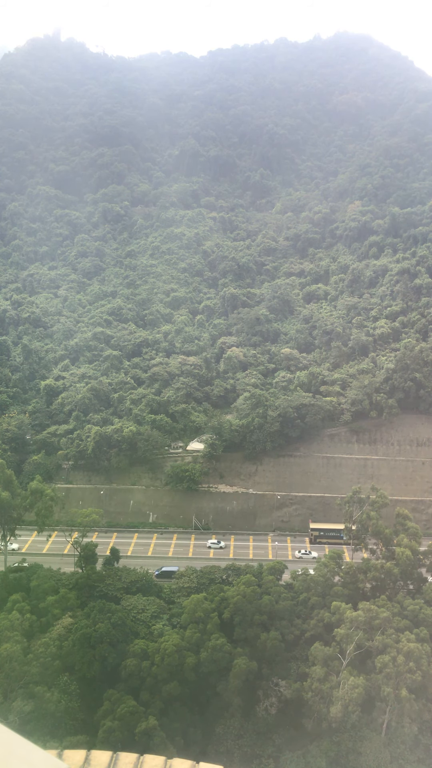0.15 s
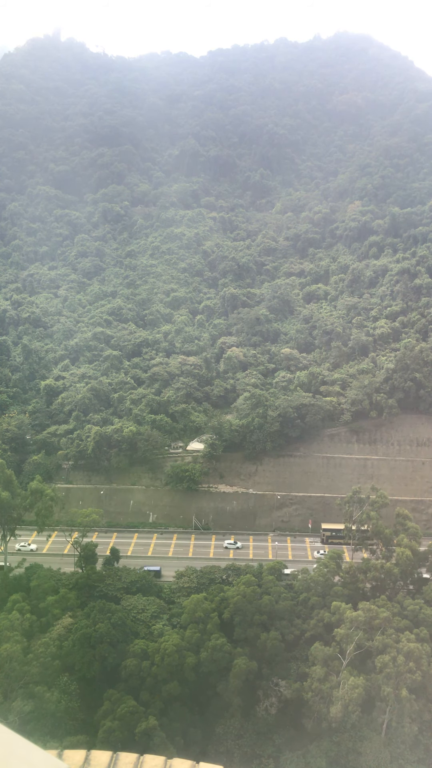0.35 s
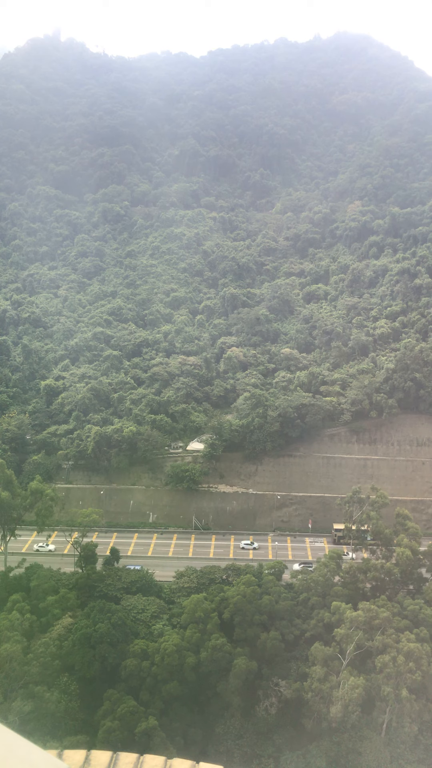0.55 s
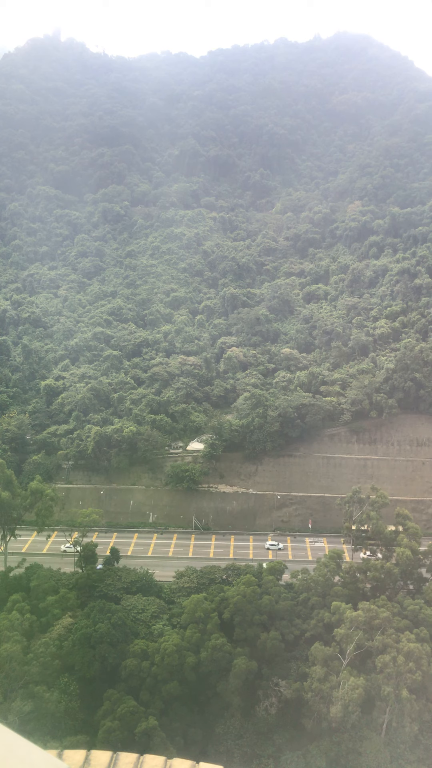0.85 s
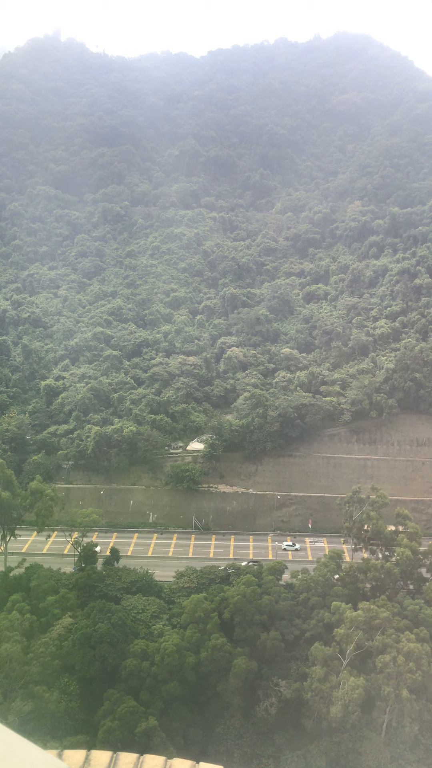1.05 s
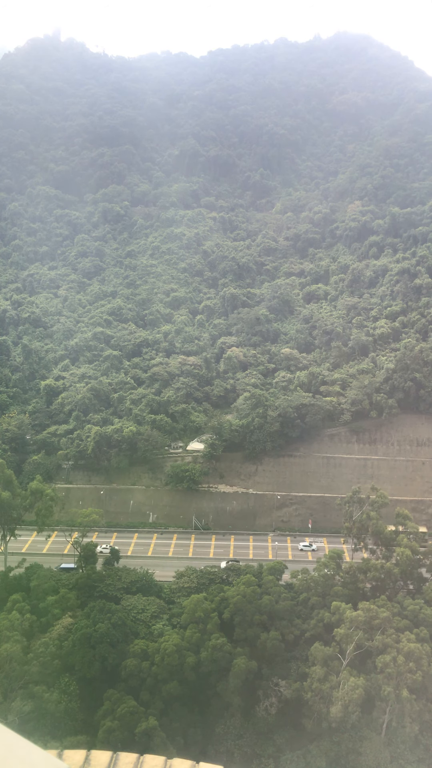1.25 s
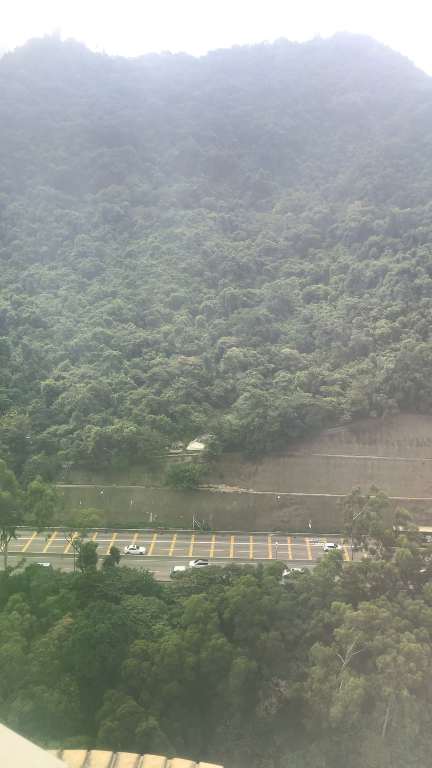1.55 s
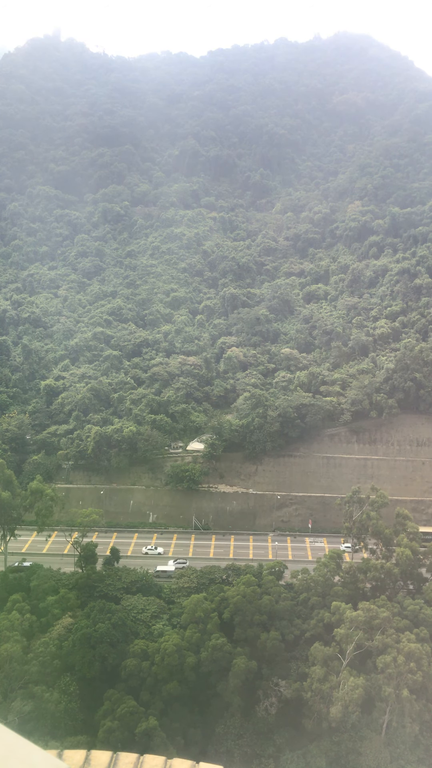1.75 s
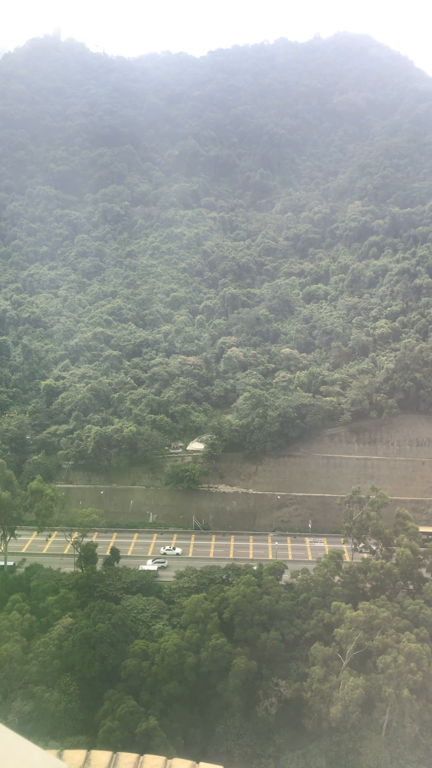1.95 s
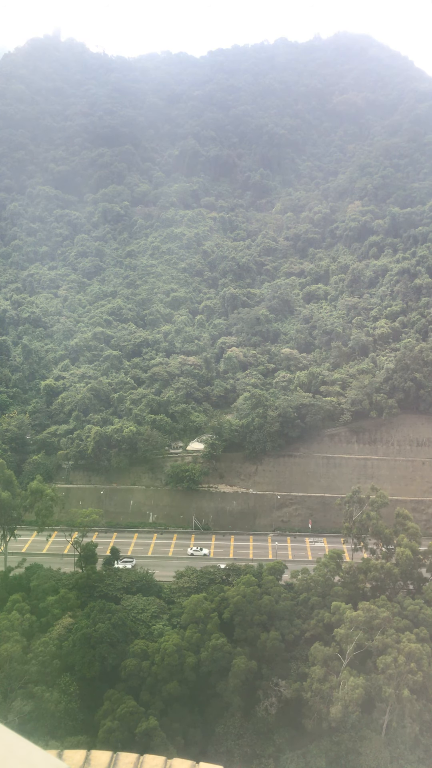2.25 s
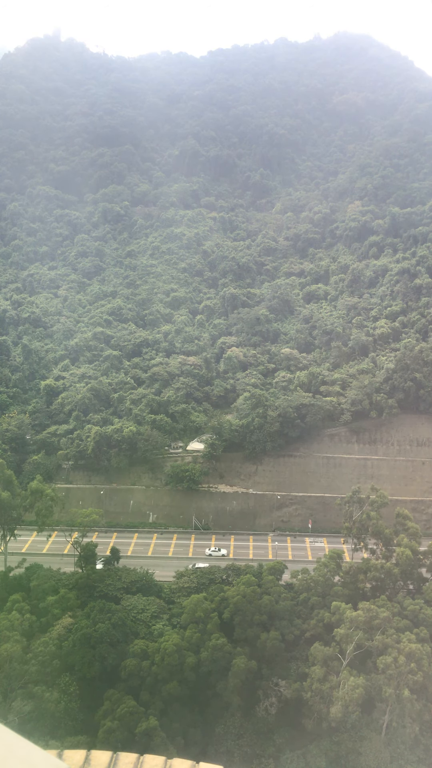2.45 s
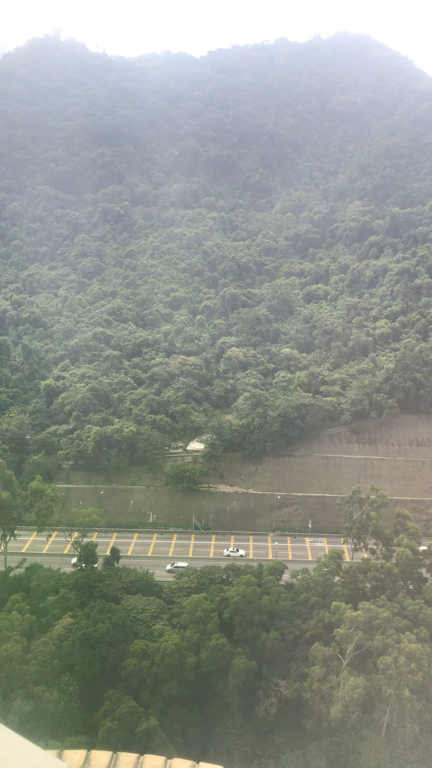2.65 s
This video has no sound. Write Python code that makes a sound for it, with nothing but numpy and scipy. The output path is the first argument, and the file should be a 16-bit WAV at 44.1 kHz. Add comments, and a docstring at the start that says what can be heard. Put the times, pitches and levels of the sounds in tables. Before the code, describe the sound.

Road traffic rumbles below a high balcony, building from the start over a steady machine hum. One sharp click rings briefly close by at about 0.4 seconds. A heavy engine drones past with tyre noise and faint gear whine, loudest around 1.8 seconds, then eases away by 2.7 seconds. Light ticks come near 1.3, 2.1 and 2.2 seconds, with a very soft rustle at 1.5.

```python
"""A busy road from a high balcony

A heavy engine drones past, sounding orders of its firing rate, over the broadband rumble, roar and
tyre noise of traffic that swells and eases. Gears whine and a machine hums steadily. Close by, one
sharp click and a few faint ticks reverberate briefly between hard walls, and there is a soft rustle."""
import sys
import numpy as np
from scipy import signal
from scipy.fft import rfft, irfft
from scipy.io import wavfile

SR = 44100
rng = np.random.default_rng(int(sys.argv[2]) if len(sys.argv) > 2 else 0)


def bounce(signal):
    """Save signal as a 16-bit WAV file at the path given by the first command-line argument."""
    frames = np.transpose(np.atleast_2d(signal))
    limited = np.clip(frames, -1, 1)
    pcm = np.round(limited * 32767).astype(np.int16)
    wavfile.write(sys.argv[1], SR, pcm)


N = 121275
T = np.arange(N) / SR
REFLECTION_HOLD_S = 0.016  # time from an impact until its reflections begin to decay


def amp(db):
    """Amplitude ratio of a level: a factor of ten for every 20 dB."""
    return 10 ** (np.asarray(db) / 20)


def unit(x):
    """Normalisation to an rms value of 1."""
    return x / np.sqrt(np.mean(x ** 2) + 1e-20)


def curve(rows, column=1):
    """Linear interpolation of one column of a time table at every sample."""
    rows = np.array(rows)
    return np.interp(T, rows[:, 0], rows[:, column])


def noise(spectrum):
    """Spectral shaping: white noise weighted by rows of f/Hz, relative density/dB, then set to rms 1."""
    octave = np.log2(np.fft.rfftfreq(N, 1 / SR) + 1)
    hz, db = np.transpose(spectrum)
    colour = np.interp(octave, np.log2(hz), db, right=-100)
    return unit(irfft(rfft(rng.standard_normal(N)) * amp(colour), N))


def drift(rate_hz):
    """Random modulation: low-pass noise of zero mean and rms 1."""
    hz = np.fft.rfftfreq(N, 1 / SR)
    low_pass = np.exp(-(hz / rate_hz) ** 2) * (hz > 0)
    return unit(irfft(rfft(rng.standard_normal(N)) * low_pass, N))


def engine():
    """Periodic excitation: a passing engine's exhaust sounds orders of its wavering firing rate."""
    # firing rate: t/s, f/Hz
    firing_rate = [(0, 88.77), (.45, 90.53), (.85, 89.52), (1.1, 86.67), (1.4, 85.5), (1.74, 83),
                   (1.81, 85.2), (1.9, 93.5), (2.08, 97.1), (2.16, 86.4), (2.3, 78.1), (2.75, 87.85)]
    # exhaust partials: multiple of the firing rate, relative level/dB
    orders = [(1, -1.5), (1.36, -14), (4, -25.5), (5, -29)]
    # envelope of the drone: t/s, relative level/dB
    envelope = [(0, -59.5), (.13, -41), (.18, -43), (.23, -37.5), (.37, -44), (.46, -31.5), (.55, -36),
                (.62, -38.5), (.67, -47), (.72, -33), (.8, -36.5), (.94, -35), (1.0, -31), (1.06, -28),
                (1.1, -42.5), (1.135, -28.5), (1.35, -33), (1.44, -39), (1.51, -46), (1.575, -29.5),
                (1.63, -36.5), (1.69, -47), (1.735, -23), (1.772, -25), (1.807, -20), (1.865, -38),
                (1.9, -30), (1.96, -47), (2.05, -44.5), (2.15, -33.5), (2.22, -51), (2.35, -61),
                (2.75, -47.5)]
    gain_db, wander, flutter_db = -1, .015, 1.65
    cycles = np.cumsum(curve(firing_rate) * (1 + wander * drift(11))) / SR
    tone = 0
    for order, db in orders:
        tone += amp(db + flutter_db * drift(14.6)) * np.sin(2 * np.pi * (order * cycles + rng.random()))
    return amp(gain_db + curve(envelope)) * unit(tone)


def traffic():
    """Incoherent addition: many engines and tyres on asphalt blend into three bands of noise."""
    # swell of the traffic: t/s, relative rumble level/dB, relative roar level/dB
    swell = [(0, -53, -49.5), (.35, -46.5, -43), (.8, -45.5, -42.5), (1.0, -39, -38.5), (1.2, -39.5, -45.5),
             (1.5, -40.5, -41), (1.88, -39, -43.5), (2.0, -45, -43.5), (2.13, -40, -45.5),
             (2.3, -46.5, -47), (2.45, -47.5, -50), (2.75, -49.5, -47.5)]
    # swell of the tyre noise: t/s, relative level/dB
    tyre_swell = [(0, -61), (.25, -51), (.6, -48), (.95, -46.3), (1.38, -47), (1.46, -44.5), (1.57, -45),
                  (1.68, -48), (1.83, -45.5), (1.9, -50), (2.05, -52), (2.35, -55), (2.75, -55.5)]
    # spectra of low rumble, engine roar and rolling tyres: f/Hz, relative density/dB
    rumble_spectrum = [(22, -55), (28, -26), (34, 3), (46, -0.5), (56, -2), (66, 2.5), (85, -3.5),
                       (105, -2), (122, -4), (160, -8.5), (195, -12.5), (400, -48)]
    roar_spectrum = [(100, -10), (170, -4), (205, -3.5), (245, 4), (350, 2), (400, -1.5), (550, -3),
                     (680, -9), (800, -21), (1300, -39)]
    tyre_spectrum = [(300, -9.5), (700, 2.5), (810, -2), (950, 4.5), (1130, 0), (1320, 5.5), (1600, -2),
                     (2100, -5.5), (3000, -10.5), (4200, -18), (5000, -23.5), (6200, -22), (8000, -33.5),
                     (11000, -56)]
    rumble_db, roar_db, tyre_db = 4.5, -2, -2
    rumble = noise(rumble_spectrum) * amp(rumble_db + curve(swell))
    roar = noise(roar_spectrum) * amp(roar_db + curve(swell, column=2))
    tyres = noise(tyre_spectrum) * amp(tyre_db + curve(tyre_swell) + .6 * drift(37))
    return rumble + roar + tyres


def hum():
    """Line spectrum over a continuum: a machine's steady tones waver slightly in a faint hiss."""
    # machine tones: f/Hz, rms level/dB
    tones = [(323, -53.5), (1246, -71.5), (1665, -74.5), (2912, -83), (4178, -89.5)]
    # envelope of the hiss: t/s, level/dB
    hiss_level = [(0, -62.5), (.5, -61), (2.0, -60.5), (2.2, -57), (2.4, -59.5), (2.75, -62.5)]
    # spectrum of the hiss: f/Hz, relative density/dB
    hiss_spectrum = [(100, 21.5), (1000, 8.5), (3000, -1), (4300, 0.5), (4900, -4.5), (5700, 1),
                     (7600, -3.5), (8500, -6.5), (9800, -8), (10400, -12), (11200, -8.5), (16000, -10.5)]
    wander_hz, flutter_db = 0.95, 1.06
    out = amp(curve(hiss_level)) * noise(hiss_spectrum)
    for hz, db in tones:
        cycles = np.cumsum(hz + wander_hz * drift(2.7)) / SR
        out += amp(db + flutter_db * drift(13)) * np.sqrt(2) * np.sin(2 * np.pi * cycles)
    return out


def ticks():
    """Damped resonance: each light, grainy tap has one broad peak and a short tail of reflections."""
    # taps: onset t/s, level/dB, tilt/(dB per octave), resonance f/Hz, rise/s, T60/s
    taps = [(.2055, -61.5, 2, 6100, .001, .2), (1.216, -57, -0.5, 3020, 0.0022, .1),
            (1.27, -44.5, -1.5, 2330, .006, 0.16), (2.095, -49.5, 0.4, 4820, 0.0022, 0.25),
            (2.224, -46.5, -2, 620, 0.0025, 0.084), (2.717, -68, 6, 8260, .002, 0.13)]
    # spectrum before tilt and resonance: f/Hz, relative density/dB
    base_spectrum = [(100, -40), (250, -14), (450, 10), (900, -4), (1500, 2.5), (2300, -4.5), (3500, -8),
                     (5000, -16), (7500, -15), (8600, -19), (10500, -24), (13000, -22), (16000, -27)]
    resonance_db, width_octaves, grain_db = 6.5, 0.8, 1.75
    hz, base_db = np.transpose(base_spectrum)
    out = 0
    for start, db, tilt, resonance_hz, rise, t60 in taps:
        t = np.maximum(T - start, 0)
        octaves = np.log2(hz / resonance_hz)
        colour = base_db + tilt * octaves + resonance_db * np.exp(-.5 * (octaves / width_octaves) ** 2)
        attack = np.minimum(t / rise, 1)
        decay_db = -60 * np.maximum(t - REFLECTION_HOLD_S, 0) / t60
        out += noise(np.c_[hz, colour]) * attack * amp(db + decay_db + grain_db * drift(500))
    return out


def click():
    """Impulse response: a bright crack, ringing modes and dense reflections whose treble dies first."""
    # spectra of the first crack and of the reflections: f/Hz, relative density/dB
    crack_spectrum = [(1000, -10), (3000, -2), (7500, 0), (11000, -8), (16000, -13)]
    echo_spectrum = [(250, -27), (700, -5), (1000, 5.5), (1600, 5.5), (2100, -0.5), (2800, -0.5),
                     (3700, -7.5), (4400, -2), (5000, -10.5), (6200, -9), (7600, -6.5), (8400, -15.5),
                     (9900, -13), (10500, -20.5), (12000, -21.5), (15800, -31)]
    # ringing modes: f/Hz, relative level/dB, T60/s
    modes = [(1625, -13, 0.17), (1860, -7, 0.25), (1968, -15, 0.15), (2500, -11, .2), (2920, -14, 0.39),
             (4100, -15, 0.3), (4540, -22, 0.23), (7290, -22, .22), (8818, -27, .2)]
    start_s, rise_s = .4303, 0.00059
    crack_db, response_db = -47, -39
    crack_t60_s, body_t60_s, treble_t60_s = 0.018, 0.3, 0.22
    t = np.maximum(T - start_s, 0)
    late = np.maximum(t - REFLECTION_HOLD_S, 0)
    echoes = noise(echo_spectrum) * amp(1.5 * drift(440))
    body = signal.sosfiltfilt(signal.butter(2, 7000, fs=SR, output="sos"), echoes)
    treble = echoes - body
    tail = body * amp(-60 * late / body_t60_s) + treble * amp(-60 * late / treble_t60_s)
    ring = sum(amp(db - 60 * t / t60) * np.sin(2 * np.pi * (hz * t + rng.random()))
               for hz, db, t60 in modes)
    crack = noise(crack_spectrum) * amp(crack_db - 60 * t / crack_t60_s)
    return np.minimum(t / rise_s, 1) * (crack + amp(response_db) * (tail + ring))


def whines():
    """Amplitude and frequency modulation: passing engine and gear tones swell, sag in pitch and fade."""
    # passing vehicles: loudest t/s, Gaussian width/s, f/Hz, greatest rms level/dB
    passes = [(.72, 0.26, 561, -53), (.95, 0.084, 528.6, -52), (1.45, 0.061, 423, -46),
              (1.76, .18, 351, -54.5)]
    sag_per_s, wander = 0.01215, 0.0082  # fractions of the frequency
    out = 0
    for centre, width, hz, db in passes:
        cycles = np.cumsum(hz * (1 - sag_per_s * (T - centre) + wander * drift(11.7))) / SR
        envelope = amp(db) * np.exp(-.5 * ((T - centre) / width) ** 2)
        out += envelope * np.sqrt(2) * np.sin(2 * np.pi * cycles)
    return out


def rustle():
    """Noise burst: a Gaussian envelope shapes a brief, soft brush of treble."""
    # spectrum of the rustle: f/Hz, relative density/dB
    spectrum = [(2000, -9), (5000, 0), (8000, 0), (10500, -3), (13000, 0), (16000, 0)]
    centre_s, width_s, level_db = 1.52, .027, -66
    return noise(spectrum) * amp(level_db) * np.exp(-.5 * ((T - centre_s) / width_s) ** 2)


def scene():
    """Superposition: the road below and the small sounds close by add in one channel."""
    return (engine() + traffic() + whines() + hum() + click() + rustle() + ticks())[None]


def record(dry):
    """Band limiting: a linear-phase low-pass filter removes the highest treble."""
    cutoff_hz = 15850
    low_pass = signal.firwin(511, cutoff_hz, window=("kaiser", 9), fs=SR)
    return signal.oaconvolve(dry, low_pass[None], "same")


dry = scene()
out = record(dry)
bounce(out)
```